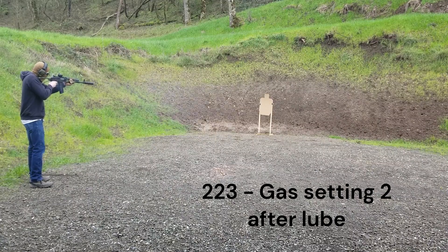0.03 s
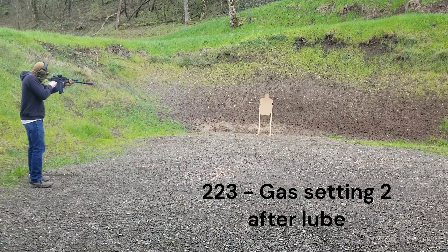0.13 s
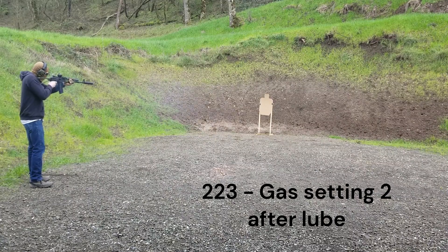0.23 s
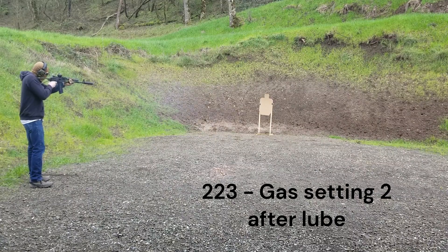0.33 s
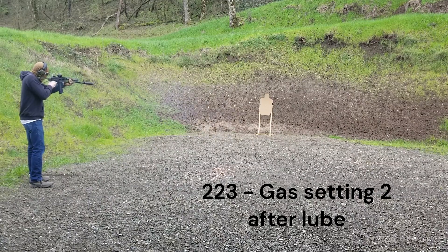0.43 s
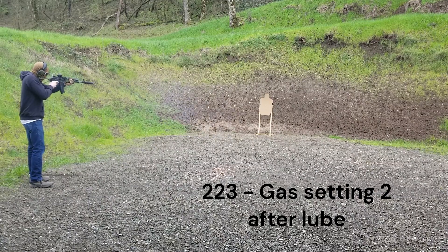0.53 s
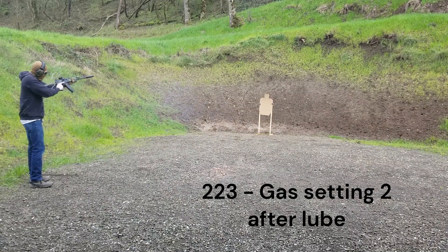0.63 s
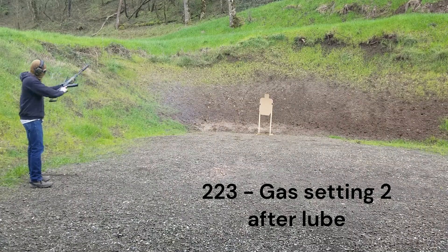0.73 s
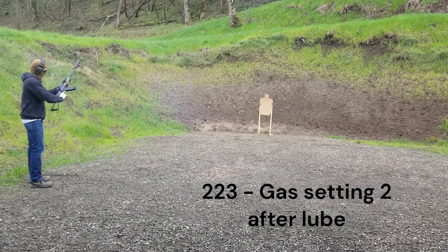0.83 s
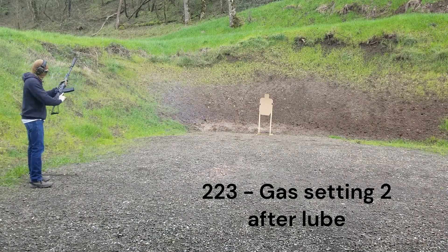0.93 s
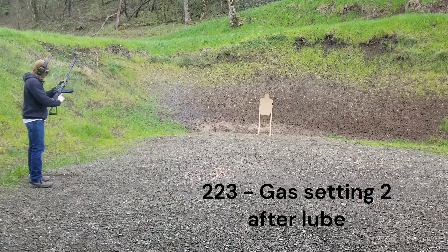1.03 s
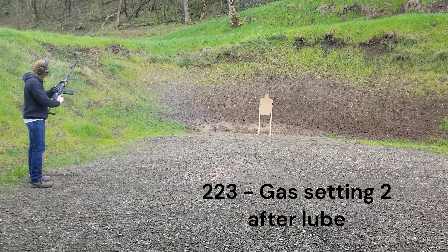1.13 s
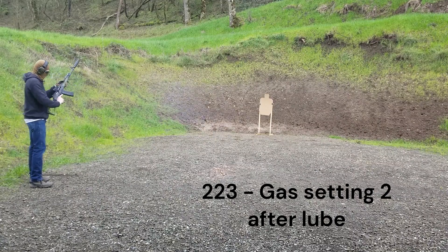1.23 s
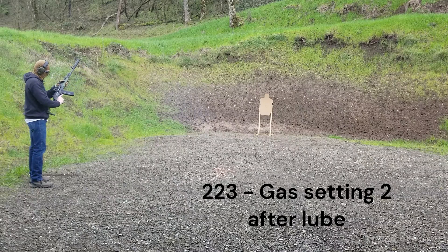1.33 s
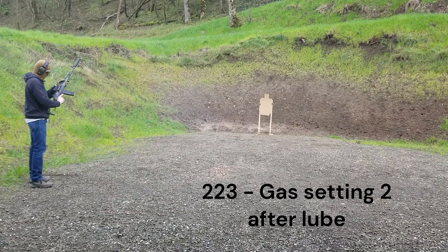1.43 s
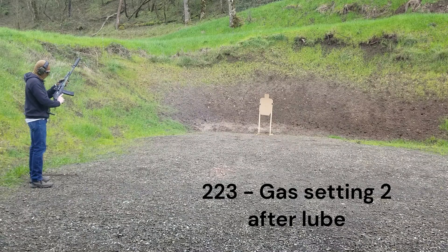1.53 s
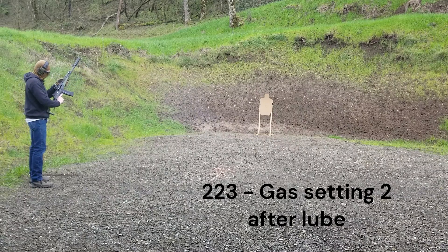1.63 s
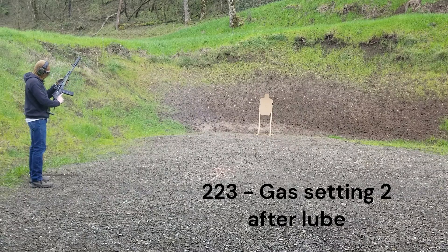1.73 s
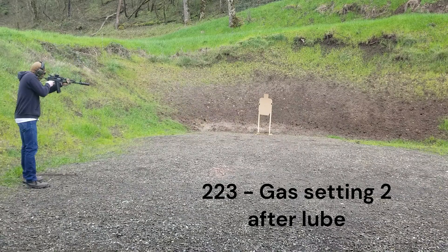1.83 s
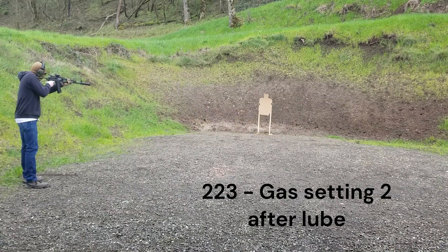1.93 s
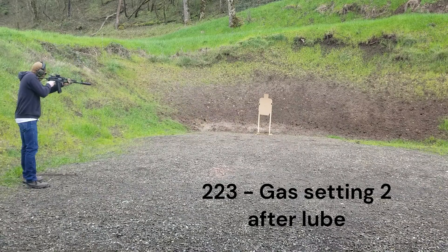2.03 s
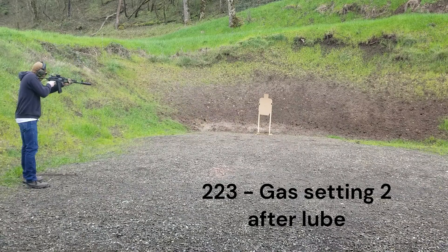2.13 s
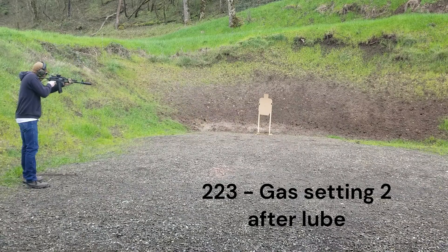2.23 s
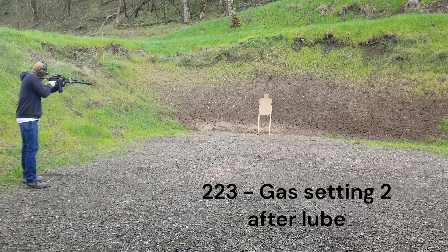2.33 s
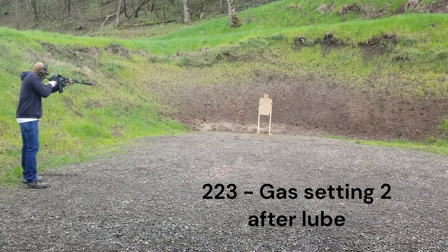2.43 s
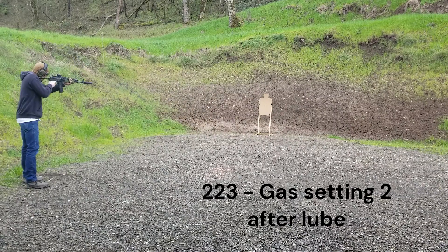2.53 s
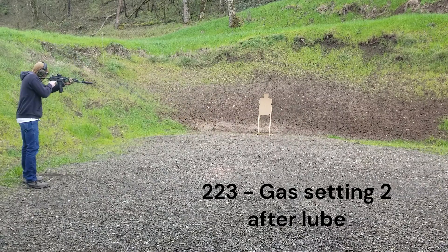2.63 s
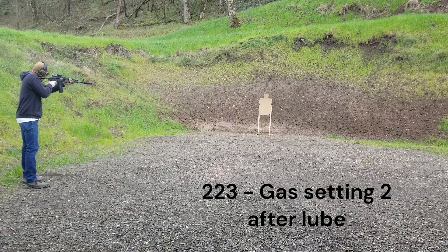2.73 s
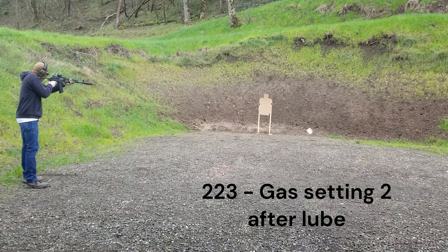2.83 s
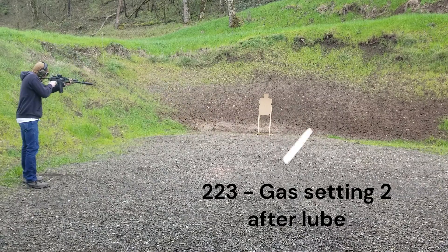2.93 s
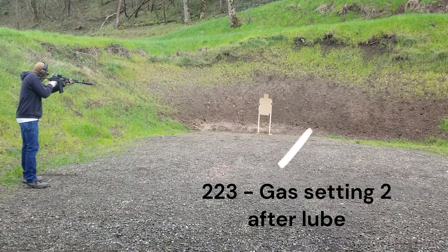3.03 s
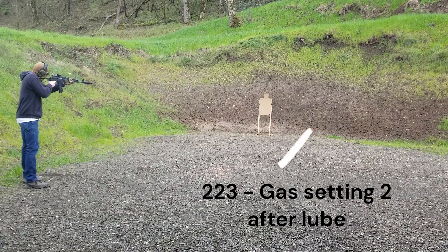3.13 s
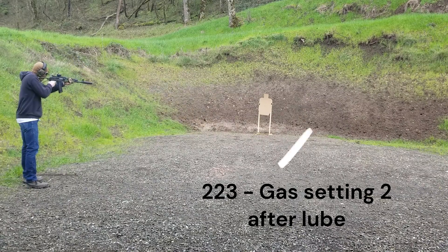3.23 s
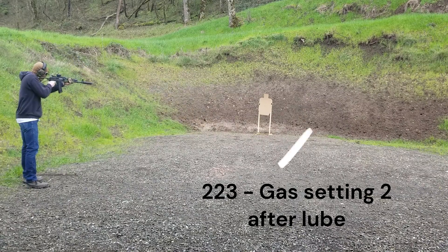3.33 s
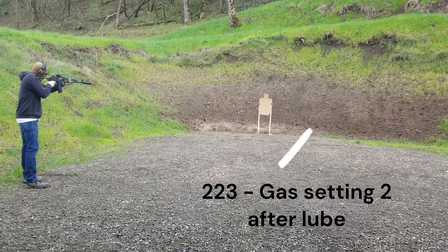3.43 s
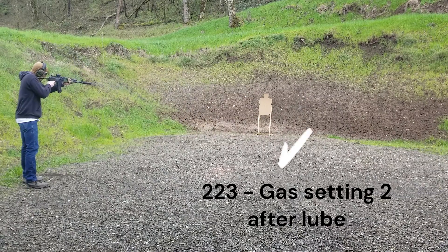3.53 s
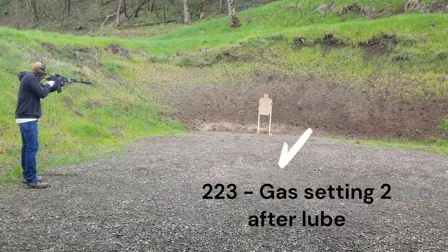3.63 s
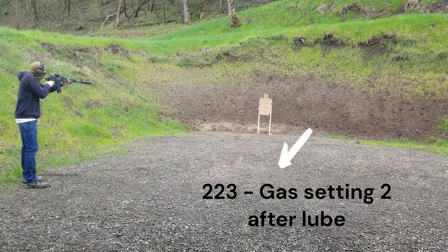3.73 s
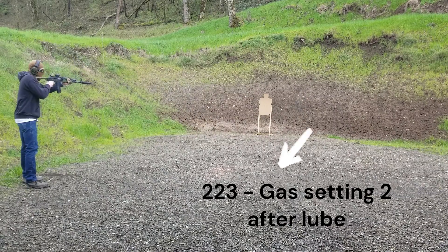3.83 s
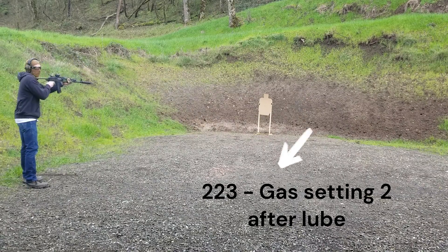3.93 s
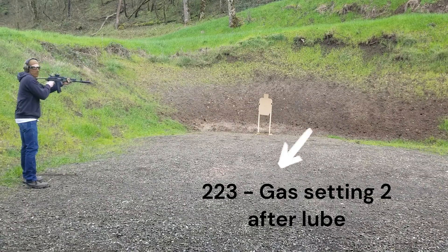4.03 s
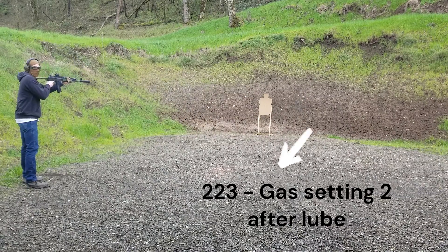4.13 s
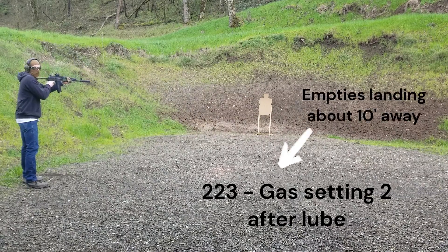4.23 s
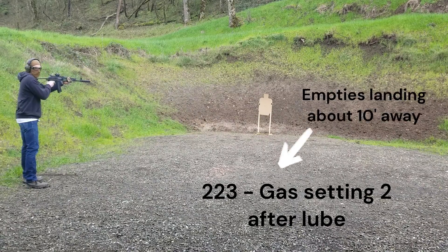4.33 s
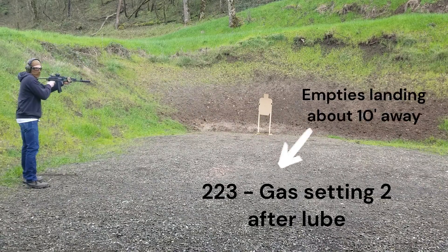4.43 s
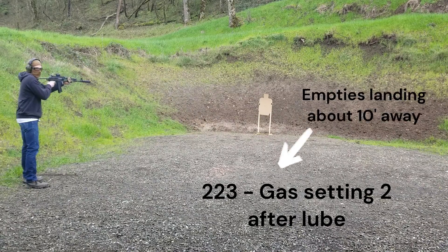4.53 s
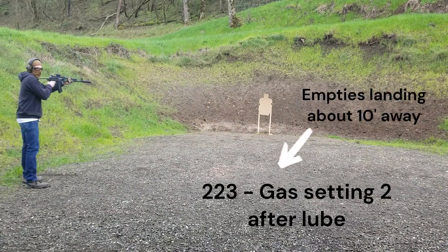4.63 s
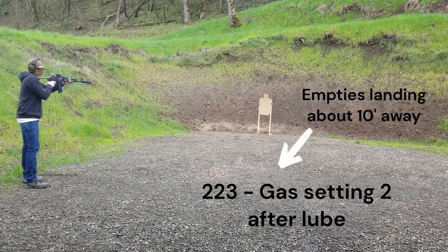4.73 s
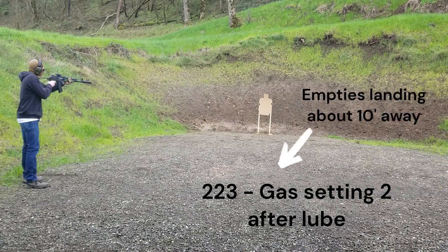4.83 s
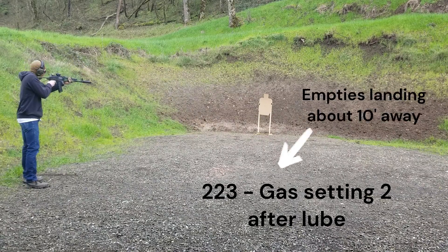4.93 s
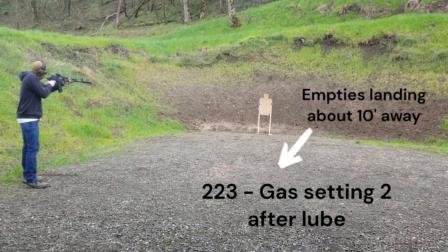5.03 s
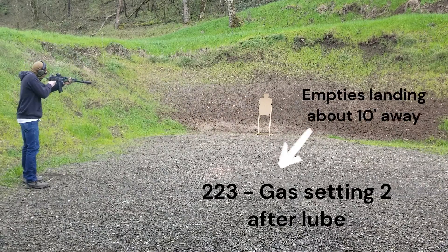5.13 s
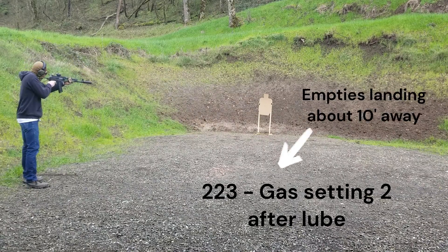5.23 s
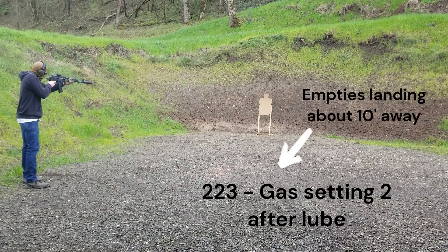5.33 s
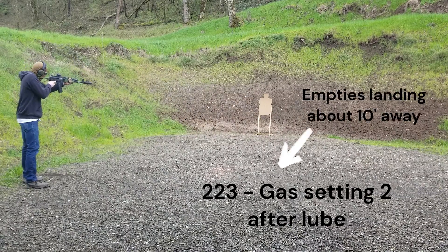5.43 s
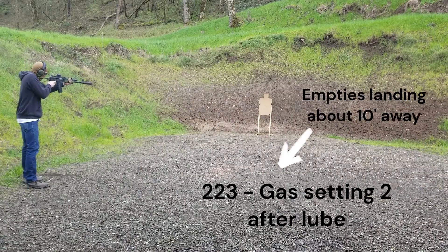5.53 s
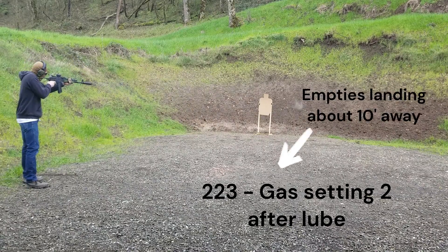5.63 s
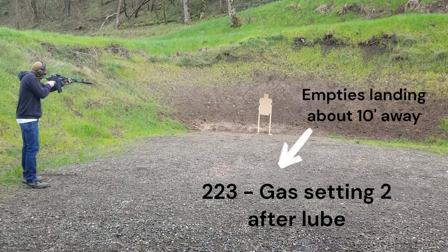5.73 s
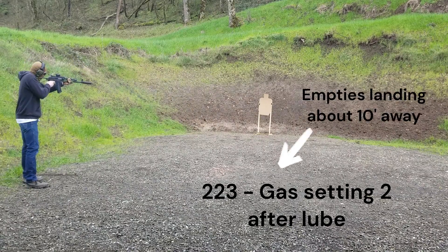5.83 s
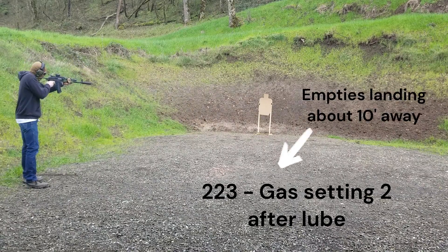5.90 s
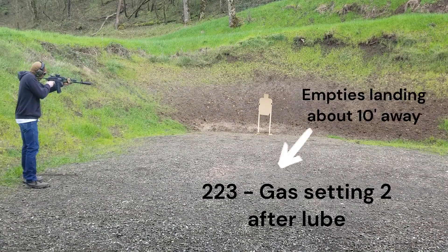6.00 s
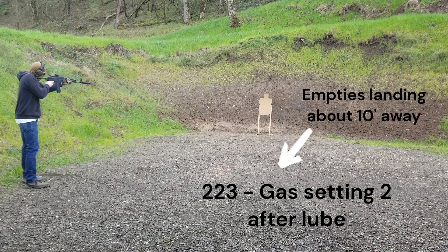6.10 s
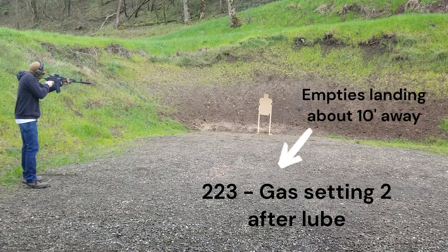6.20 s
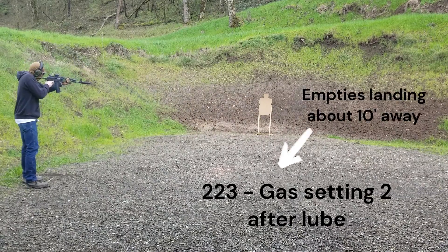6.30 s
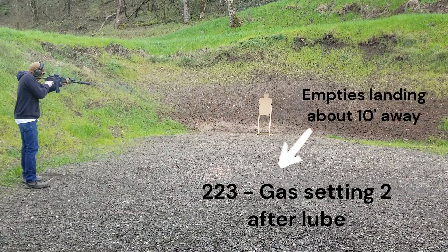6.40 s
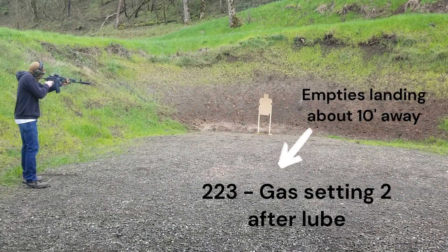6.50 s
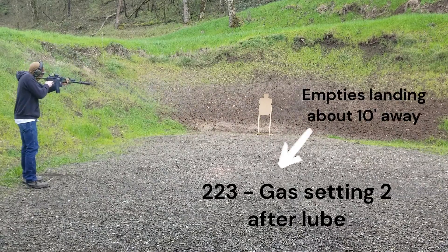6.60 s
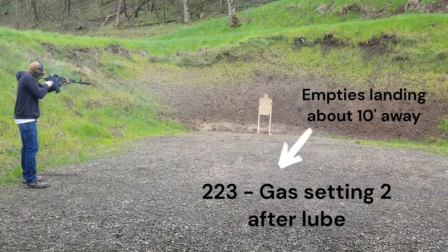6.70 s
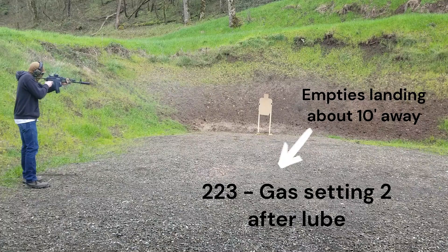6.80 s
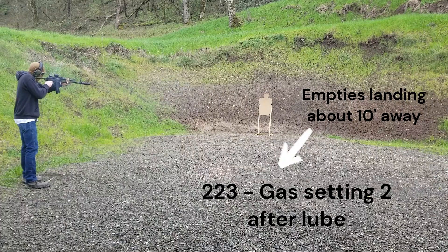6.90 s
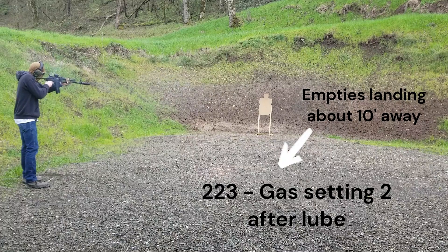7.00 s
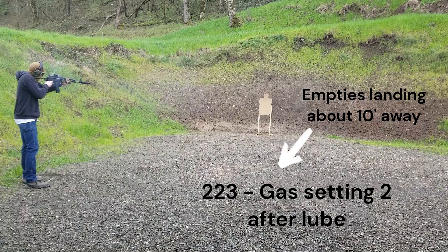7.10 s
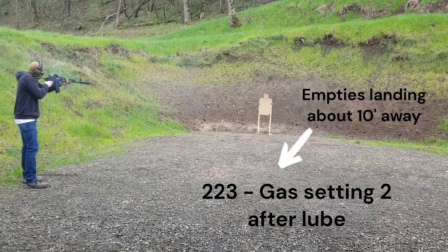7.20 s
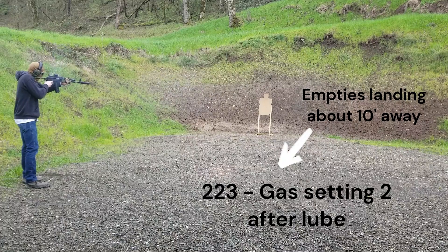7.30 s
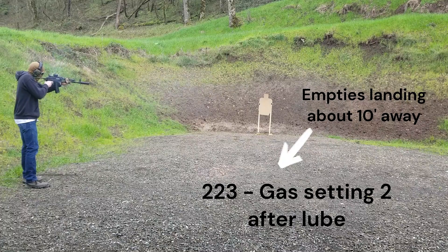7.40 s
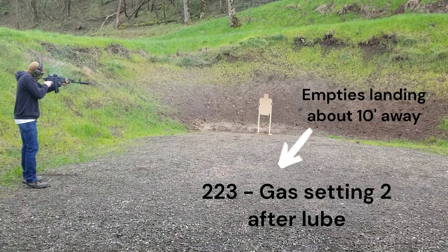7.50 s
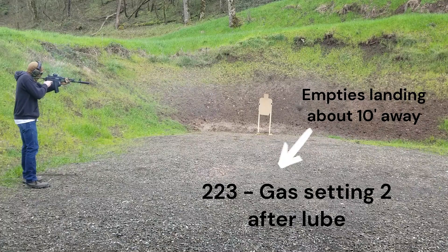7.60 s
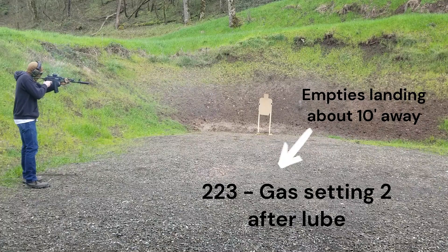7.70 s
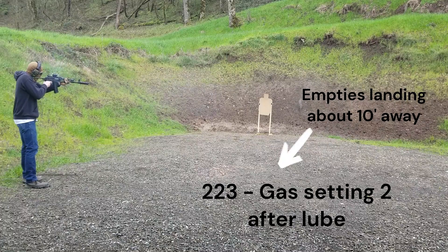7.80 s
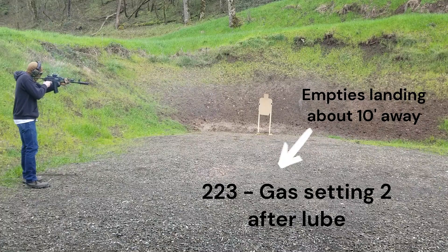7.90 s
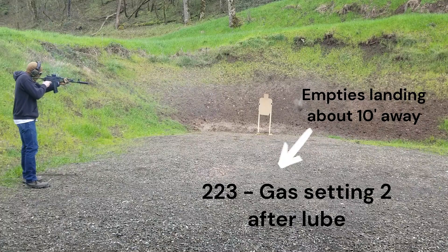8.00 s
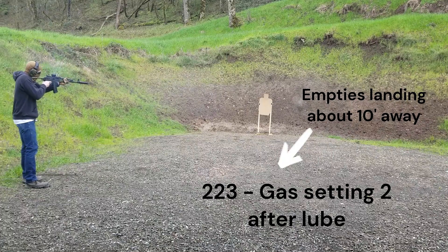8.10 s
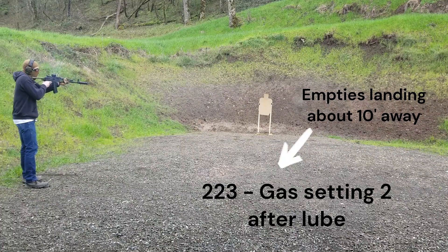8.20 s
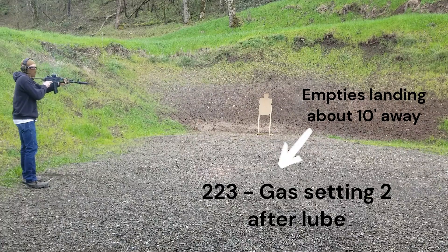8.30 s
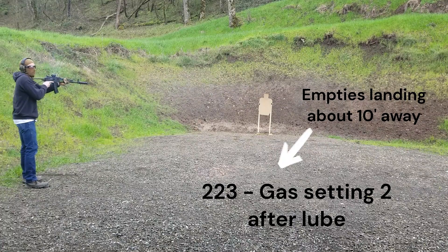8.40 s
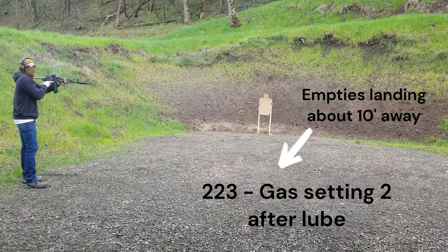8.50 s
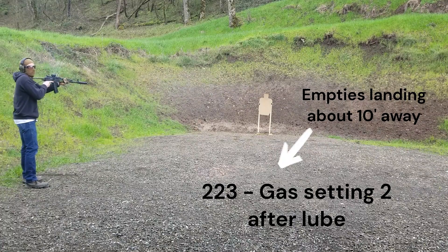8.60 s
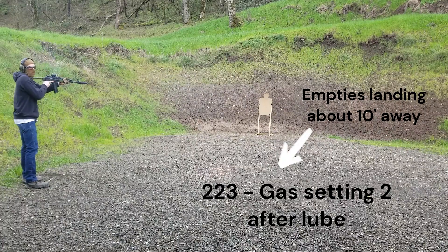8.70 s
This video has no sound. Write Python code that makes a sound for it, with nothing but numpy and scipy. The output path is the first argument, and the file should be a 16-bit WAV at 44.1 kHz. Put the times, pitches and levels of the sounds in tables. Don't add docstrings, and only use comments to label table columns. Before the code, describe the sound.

Outdoors in an earth-walled shooting bay, a suppressed rifle cracks once, then pauses while empty cases tick and ring on gravel. Dull shots roll in from other bays and a distant steel plate rings. Three spaced shots follow, another pause, then a quick uneven string of seven. Each blast has a dense, darkening echo. A small stereo microphone pair stands nearby, the rifle slightly left, brass to the right.

```python
import sys
import numpy as np
from scipy import signal
from scipy.io import wavfile

SR = 44100
rng = np.random.default_rng(int(sys.argv[2]) if len(sys.argv) > 2 else 0)


def field_ratio(decibels):
    return 10 ** (np.asarray(decibels, dtype=float) / 20)


def unload_wav(signal):
    wavfile.write(
        sys.argv[1],
        SR,
        np.round(np.clip(np.atleast_2d(signal).T, -1, 1) * 32767).astype(np.int16),
    )


N = 385875

# start in seconds, peak in dB, extra body below 1.5 kHz in dB,
# extra slap from the back bank in dB.
SHOTS = [(0.105, -6.5, -1.5, -2.5), (2.482, -5, 0.6, -1.5), (3.072, -5.5, -0.8, -1.5),
         (3.548, -5.5, -1.6, -0.5), (5.635, -4, -1.6, 8), (6.049, -5.5, -1, -22), (6.403, -6, -1.5, -5),
         (6.635, -5.5, -2.5, -7), (7.018, -5.5, -0.9, -2), (7.477, -6, -2.5, -8.5),
         (7.937, -4.5, -0.6, -0.5)]
# start in seconds, tick in dB, lower ring in dB, upper ring in dB.
CASES = [(0.2944, -40, -57, -55), (0.5934, -44.5, -55, -51), (0.6669, -41, -57, -50),
         (0.8884, -61, -74, -58), (1.0795, -44.5, -59, -58), (1.2524, -69, -89, -77),
         (1.3516, -61, -73, -71), (1.5229, -53.5, -60.5, -71), (1.6621, -57, -72, -63),
         (2.8983, -43.5, -74.5, -79), (3.3972, -40.5, -61.5, -70), (3.8147, -41, -53.5, -46),
         (4.1494, -77, -68, -80), (4.3794, -74, -80, -71), (4.6214, -52, -55, -59), (4.887, -52, -64, -62),
         (5.3986, -35, -68, -65), (5.5054, -18.5, -64.5, -55), (5.928, -53, -74, -74),
         (6.2994, -51, -65, -76), (6.967, -55, -72, -51), (7.26, -52, -68, -63), (7.417, -51.5, -62, -66),
         (7.8037, -55, -69, -56), (8.2564, -53, -62, -54), (8.334, -42.5, -63, -57),
         (8.693, -50.5, -58.5, -66)]


def shot_echoes():
    earlier_shot = (-0.12, -1.5, 0.42, 0)
    # frequency in Hz, level in dB per Hz,
    # extra loss in air and leaves in dB per s.
    blast = [(39, -14, 57.5), (100, 1, 51), (250, -5.5, 7.5), (556, -5.5, -0.5), (1300, -11.5, -1),
             (2220, -10, -2), (5000, -7.5, 19), (8100, -5.5, 53), (12100, -7.5, 86), (16000, -9.5, 85)]
    after = np.arange(int(1.6 * SR)) / SR
    brief = after[:9000]
    echo_db = echo_shape_db(after)
    uneven_db = 0.27 * drift(50)

    def add_shots(power, hz):
        blast_db = at_hz(blast, hz)
        shape = field_ratio(2 * (echo_db - at_hz(blast, hz, column=2) * after + blast_db))
        shape *= 1 + 2.1 * (hz > 9000) * np.exp(-after / 0.049)
        for s, peak_db, body_db, slap_db in [earlier_shot, *SHOTS]:
            add(power, round(s * SR), shape * field_ratio(2 * (peak_db - 3.5 + body_db * (hz < 1500))))
            if 700 < hz < 1700:
                surge_db = peak_db + slap_db - 11 + blast_db - 123 * brief
                add(power, round((s + 0.041) * SR), field_ratio(2 * surge_db))

    def add_case_ticks(power, hz):
        knock = field_ratio(2 * (3.5 - 1800 * brief))
        bay = field_ratio(2 * (-4.5 - 110 * brief))
        thin_db = -9 * max(np.log2(6000 / hz), 0)
        for s, tick_db, *rings in CASES:
            add(power, round(s * SR), (knock + bay) * field_ratio(2 * (tick_db + thin_db - 16.5)))

    def gain_at(hz):
        power = np.zeros(N)
        add_shots(power, hz)
        add_case_ticks(power, hz)
        return np.sqrt(power) * field_ratio(uneven_db + .9 * drift(45))

    return scattered([grains(14000, spread_db=2.5), grains(8000, spread_db=1.5)], gain_at)


def echo_shape_db(after):
    hold_s, knee_s = 0.081, 0.0062
    past_hold = knee_s * np.logaddexp(0, (after - hold_s) / knee_s)
    gap_db = -7 * np.exp(-((after - 0.01) / 0.0056) ** 2)
    banks_db = -1.53 - 109 * past_hold + gap_db
    woods_db = -20.5 - 31 * after ** 2
    return 10 * np.log10(field_ratio(2 * banks_db) + field_ratio(2 * woods_db))


def thumps():
    # delay after the shot in seconds, frequency in Hz, level in dB, 60 dB decay time in seconds.
    pulses = [(-.0004, 666, -21.5, 0.019), (.003, 100, -30.5, 0.045), (.004, 66.7, -29, 0.12),
              (0.033, 126.2, -30.5, .05), (.034, 234.8, -32, .03), (0.054, 1086, -21.5, 0.0069),
              (0.054, 3105, -22.5, 0.0067), (.0535, 560, -22, 0.013)]
    out = np.zeros(N)
    chances = rng.standard_normal((len(SHOTS), len(pulses)))
    for (s, peak_db, body_db, slap_db), chance in zip(SHOTS, chances):
        for (delay, hz, level_db, t60), c in zip(pulses, chance):
            back_bank_db = slap_db * (delay > .045)
            add(out, *ring(s + delay, hz, level_db + peak_db + back_bank_db + 8.5 + 0.5 * c, t60))
    return out


def cases():
    # frequency in Hz, blur in Hz, 60 dB decay time in seconds.
    modes = [
        (10800, 110, .55),
        (15120, 170, .42),
    ]
    out, t = 0, np.arange(N) / SR
    for column, (hz, blur_hz, t60) in enumerate(modes):
        power = np.zeros(N)
        for s, tick_db, *ring_db in CASES:
            add(power, round(s * SR), field_ratio(2 * (ring_db[column] + 3.5 - 60 * t[:30000] / t60)))
        phase = 2 * np.pi * hz * np.cumsum(1 + .006 * drift(5)) / SR + 3 * drift(40)
        steady = np.sin(phase) * field_ratio(3 * drift(25))
        blurred = narrow_noise(hz - blur_hz / 2, hz + blur_hz / 2)
        out = out + np.sqrt(power) * (1.1 * steady + .7 * blurred)
    return out


def ticks():
    clicks = np.zeros(N)
    for s, tick_db, *ring_db in CASES:
        clicks[round(s * SR)] = field_ratio(min(tick_db, -40) + 6)
    return signal.sosfilt(signal.butter(2, 5000, "high", fs=SR, output="sos"), clicks + 1e-18)


def handling():
    # start in seconds, level in dB, 60 dB decay time in seconds.
    rustles = [(1.08, -77, .3), (1.352, -78, .2), (1.522, -84, .35), (1.612, -68, .06), (1.63, -79, .4)]
    return dying(rustles, .001) * field_ratio(-1 + 2.9 * drift(49.4)) * narrow_noise(4200, 6500)


def far_gunfire():
    # start in seconds, first crack in dB, roll in dB, treble against the roll in dB,
    # time the crest lasts after the start in seconds.
    far_shots = [(1.55, -95, -30.5, -13.5, 0.19), (1.844, -45, -52.5, -12, .1),
                 (2.012, -26, -24, -6.5, 0.16), (2.885, -60, -43, -11.5, .15),
                 (3.44, -65, -43.5, -6.5, 0.1), (4.03, -53, -44, -7.5, 0.1),
                 (4.703, -44, -42.5, -8.5, 0.22), (4.98, -44, -51, -11.5, 0.11),
                 (5.381, -40.5, -38.5, -5.5, 0.18), (5.9, -70, -57, -3, .15), (6.27, -70, -53, 0, .15),
                 (7.289, -65, -45, -10, 0.1), (7.76, -74, -56.5, 1.5, 0.24),
                 (8.218, -65, -46.5, -15, 0.057)]
    # frequency in Hz, level in dB per Hz.
    colour = [(60, -21), (120, -20), (200, -23.5), (290, 0), (430, -5.5), (620, 1.5), (900, -3.5),
              (1500, -8.5), (2600, -8), (4400, -20), (6500, -24.5), (8600, -35), (13000, -53.5)]
    t = np.arange(N) / SR
    coarse = t[::64]
    s, crack_db, level_db, treble_db, crest_s = np.transpose(far_shots)[:, :, None]
    age = np.maximum(coarse - s, 0)
    late = np.maximum(age - crest_s, 0)
    fall_db_per_s2, end_db_per_s = 75, 43.5
    turn = end_db_per_s / fall_db_per_s2 / 2
    fall_db = fall_db_per_s2 * np.minimum(late, turn) ** 2 + end_db_per_s * np.maximum(late - turn, 0)
    swell = 1 - np.exp(-(age / 0.043) ** 1.26)
    roll = field_ratio(2 * 0.68 * drift(30)) * (t > FAR_START_S)
    cracks = np.zeros(N)
    for start, peak_db, *rest in far_shots[1:]:
        add(cracks, round(start * SR), field_ratio(2 * (peak_db - 960 * t[:4000])))

    def power_at(hz):
        share = np.clip(np.log2(hz / 900) / 2.16, 0, 1.8)
        colour_db = at_hz(colour, hz) + 12.5
        each_db = level_db - fall_db + share * (treble_db + 10 - 28 * age)
        each_db = each_db - 60 * age * (hz > 7200)
        rolls = np.interp(t, coarse, np.sum(swell ** 2 * field_ratio(2 * each_db), axis=0)) * roll
        return rolls * field_ratio(2 * colour_db) + cracks * field_ratio(2 * (colour_db - 4.3 * share))

    return power_at


FAR_START_S = 1.838


def quiet_air():
    # frequency in Hz, level in dB per Hz.
    colour = [(15, -39), (25, 0.5), (125, 3), (309, -16.5), (1120, -21), (1670, -37.5), (6040, -34),
              (8550, -46.5), (10600, -31.5), (13800, -39), (15000, -39)]
    # time in
    # seconds, level in dB.
    breeze = [(0, -67.5), (0.86, -62.5), (1.3, -69), (1.7, -63.5), (2.05, -47.5), (2.8, -65.5),
              (3.9, -63.5), (4.5, -71), (4.85, -63), (5.3, -61.5), (6.0, -60.5), (7.9, -62), (8.5, -65),
              (8.75, -69)]
    t = np.arange(N) / SR
    breeze_db = np.interp(t, *np.transpose(breeze))
    still_db = -65 - 7 * (t > FAR_START_S)

    def power_at(hz):
        strength_db = breeze_db if hz < 1500 else still_db
        return field_ratio(2 * (strength_db + 21.0 + at_hz(colour, hz)))

    return power_at


def surroundings():
    # frequency in Hz, width in Hz, level in dB. The rows up to 528 Hz are
    # resonances of the path; the rows above thin the treble near 8.5 kHz and at the top.
    path = [(200, 110, -3.5), (330, 26, 1), (455, 31, -5), (528, 91, 3), (8460, 2000, -4.5),
            (15000, 4000, -6.5)]
    guns_at, air_at = far_gunfire(), quiet_air()

    def gain_at(hz):
        return np.sqrt(guns_at(hz) + air_at(hz)) * field_ratio(0.27 * drift(32))

    return peaks(scattered(rng.standard_normal((2, 2, N)), gain_at), path)


def plate():
    # start in seconds, level in dB, 60 dB decay time in seconds.
    strikes = [
        (1.842, -56.5, 1.5),
        (2.05, -44, 2.5),
    ]
    hz, blur_hz, tone_end_s = 4285, 45, 2.47
    t = np.arange(N) / SR
    steady = np.sin(2 * np.pi * hz * t + 1.5 * drift(30))
    tone = steady + .9 * narrow_noise(hz - blur_hz / 2, hz + blur_hz / 2)
    return dying(strikes, .02) * np.clip((tone_end_s - t) / .05, 0, 1) * tone


def hum():
    # frequency in Hz, level in dB, start in seconds, end in seconds.
    motor = (135, -66, 3.9, 5.7)
    hz, level_db, start, end = motor
    t = np.arange(N) / SR
    fade = np.clip(np.minimum(t - start, end - t) / 0.47, 0, 1)
    return fade * field_ratio(level_db + 1.5 * drift(20)) * np.sin(2 * np.pi * hz * t + .7 * drift(15))


def scattered(sources, gain_at):
    # frequency in Hz, left-right likeness from 0 to 1.
    likeness = [(30, 0), (60, 0.93), (250, .85), (500, 0.69), (1000, 0.0), (4000, 0.0), (12000, 0.069)]
    out, edges = 0, 28 * 2 ** np.arange(0, 9.6, .5)
    for k, (low, high) in enumerate(zip(edges, edges[1:])):
        hz = np.sqrt(low * high)
        band = signal.butter(2, [low, high], "band", fs=SR, output="sos")
        mid, side = signal.sosfilt(band, sources[k % 2])
        alike = at_hz(likeness, hz)
        stereo = np.sqrt(1 + alike) * mid + np.sqrt(1 - alike) * side * [[1], [-1]]
        out = out + gain_at(hz) * stereo
    return out


def grains(per_s, spread_db):
    clicks = (rng.random((2, N)) < per_s / SR) * rng.standard_normal((2, N))
    clicks = clicks * field_ratio(spread_db * np.minimum(rng.exponential(1, (2, N)), 4))
    return clicks / clicks.std()


def narrow_noise(low_hz, high_hz):
    sos = signal.butter(2, [low_hz, high_hz], "band", fs=SR, output="sos")
    band = signal.sosfilt(sos, rng.standard_normal((2, N)))
    band = band[0] + .5 * band
    return band / band.std()


def ring(s, hz, level_db, t60):
    t = np.arange(int(min(t60, 1) * SR)) / SR
    return round(s * SR), field_ratio(level_db - 60 * t / t60) * np.sin(2 * np.pi * hz * t)


def dying(rows, rise_s):
    age = np.arange(SR) / SR
    power = np.zeros(N)
    for s, level_db, t60 in rows:
        swell = 1 - np.exp(-age / rise_s)
        add(power, round(s * SR), field_ratio(2 * (level_db - 60 * age / t60)) * swell ** 2)
    return np.sqrt(power)


def drift(rate):
    knots = rng.standard_normal(int(N / SR * 60) + 2)
    return np.interp(np.arange(N) / SR * rate, np.arange(len(knots)), knots) * 1.22


def peaks(x, rows):
    for hz, width, peak_db in rows:
        w, a = 2 * np.pi * hz / SR, field_ratio(peak_db / 2)
        q = w * width / hz / 2
        turn = -2 * np.cos(w)
        x = signal.lfilter([1 + q * a, turn, 1 - q * a], [1 + q / a, turn, 1 - q / a], x)
    return x


def at_hz(points, hz, column=1):
    table = np.array(points)
    return np.interp(np.log(hz), np.log(table[:, 0]), table[:, column])


def add(out, start, wave):
    first, last = max(start, 0), min(start + len(wave), N)
    out[first:last] += wave[first - start:last - start]


def scene():
    rifle = shot_echoes() + thumps()
    brass = cases() * field_ratio([[-6], [-3]]) + ticks()
    return rifle + brass + handling() + surroundings() + plate() + hum()


def low_pass(x):
    return signal.sosfilt(signal.butter(12, 16810, fs=SR, output="sos"), x)


def record(dry):
    # frequency in Hz, width in Hz, level in dB.
    ports = [
        [(6430, 1800, 8), (8320, 2700, -8), (12360, 3000, 10), (13740, 2900, 4.5)],
        [(6070, 2800, 10), (8570, 4100, -11), (12400, 3300, 4), (14750, 2400, -7)],
    ]
    out = dry * field_ratio([[0], [-2.5]])
    for k, port in enumerate(ports):
        out[k] = peaks(out[k], port)
    out = 1.1 * np.tanh(out / 1.1)
    out = signal.sosfilt(signal.cheby2(10, 45, 16300, fs=SR, output="sos"), out)
    out = signal.sosfilt(signal.butter(2, 38, "high", fs=SR, output="sos"), out)
    return low_pass(out)


dry = scene()
out = record(dry)
unload_wav(out)
```